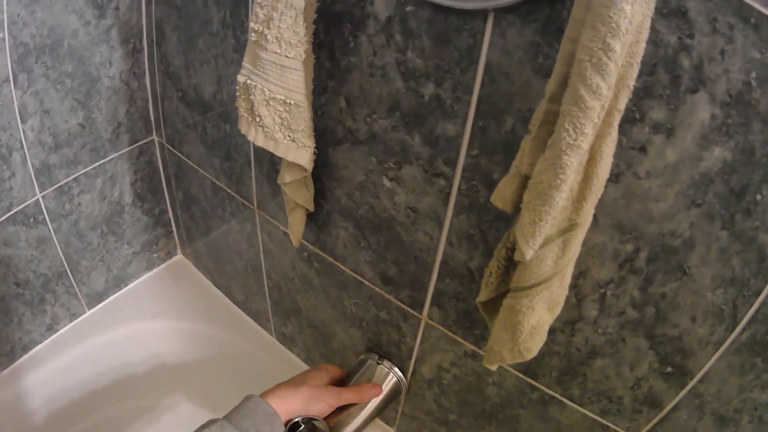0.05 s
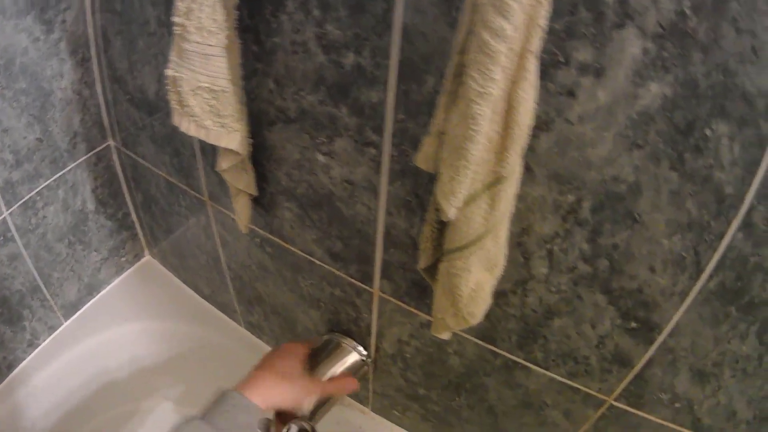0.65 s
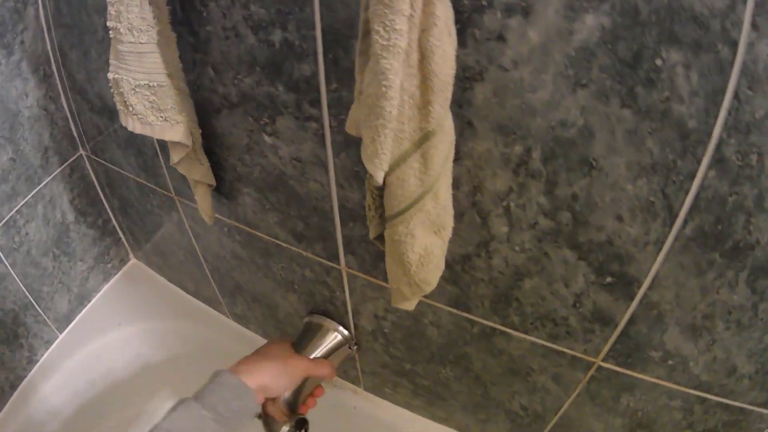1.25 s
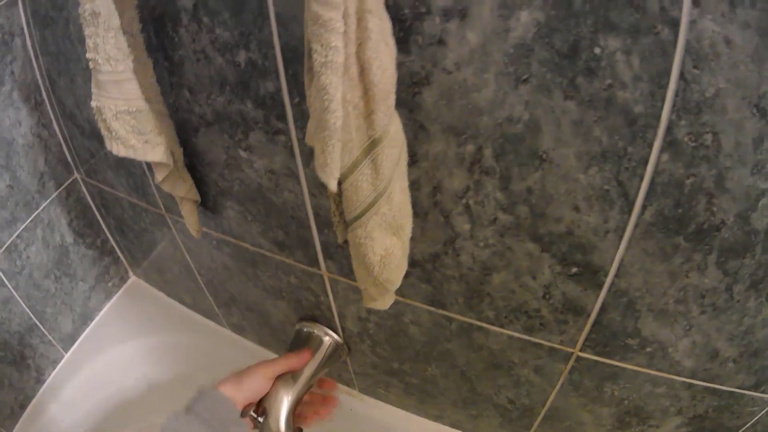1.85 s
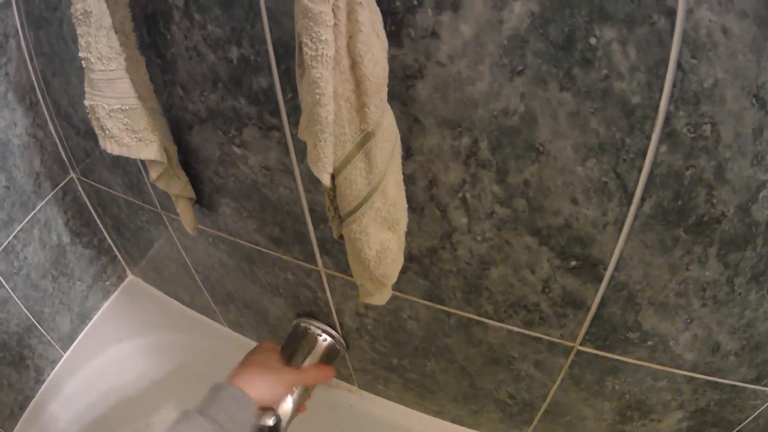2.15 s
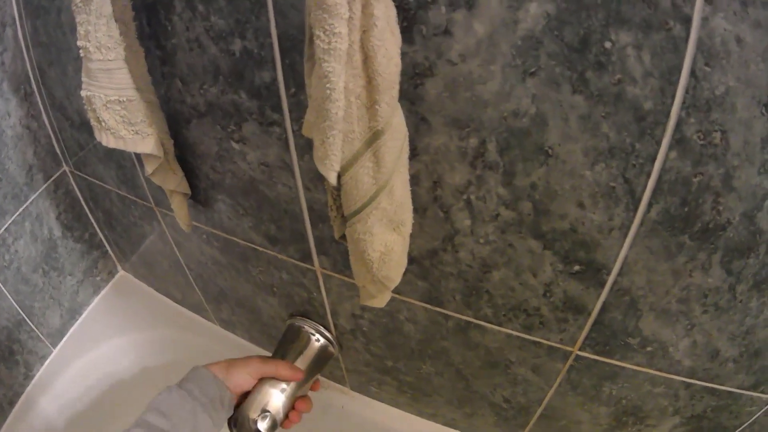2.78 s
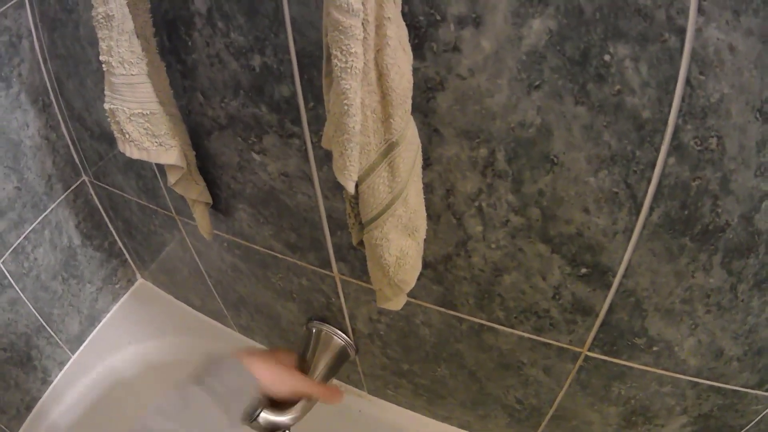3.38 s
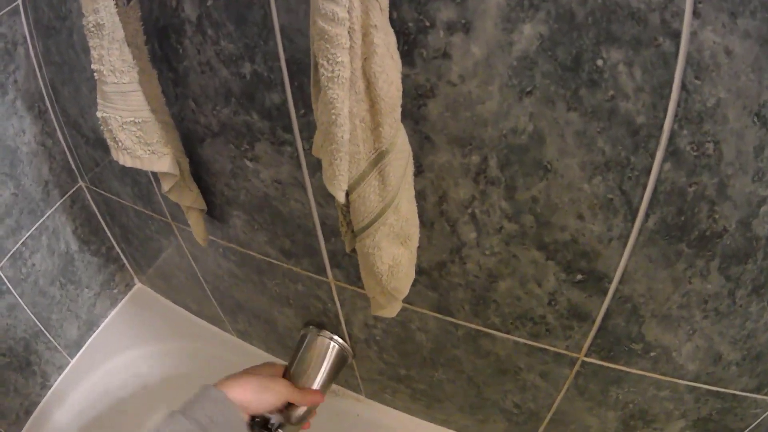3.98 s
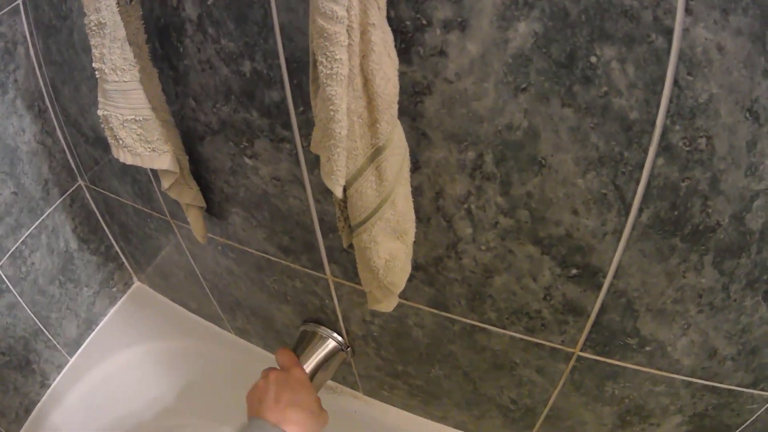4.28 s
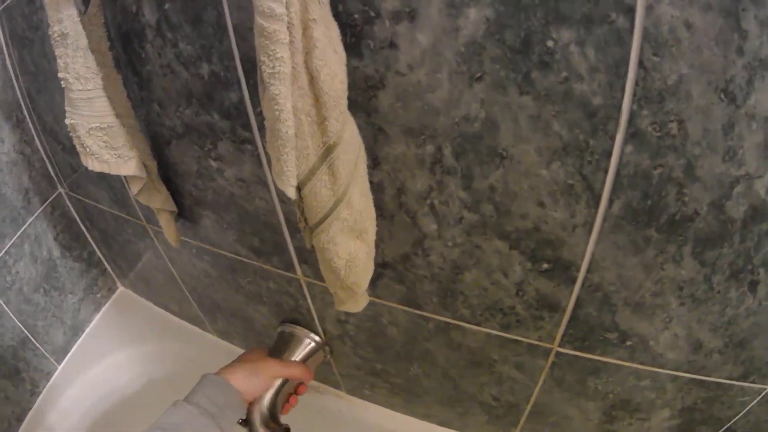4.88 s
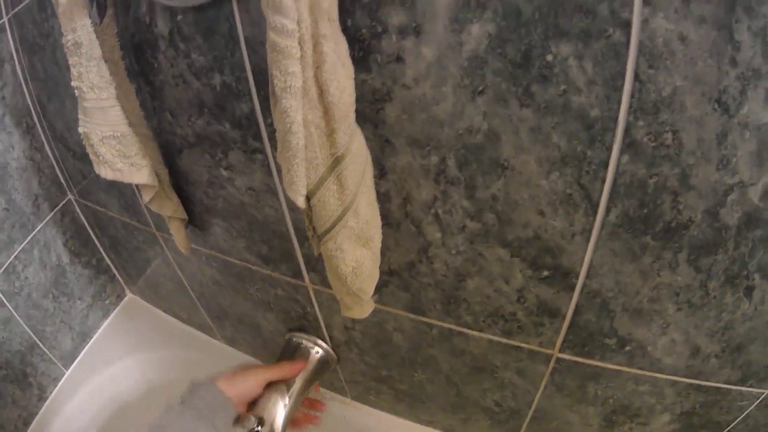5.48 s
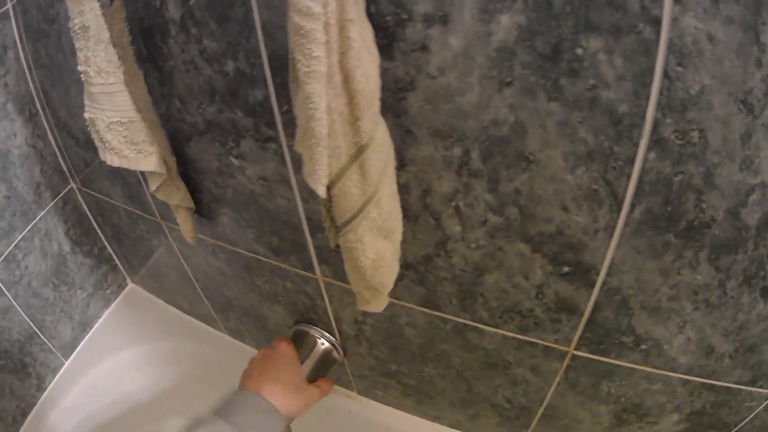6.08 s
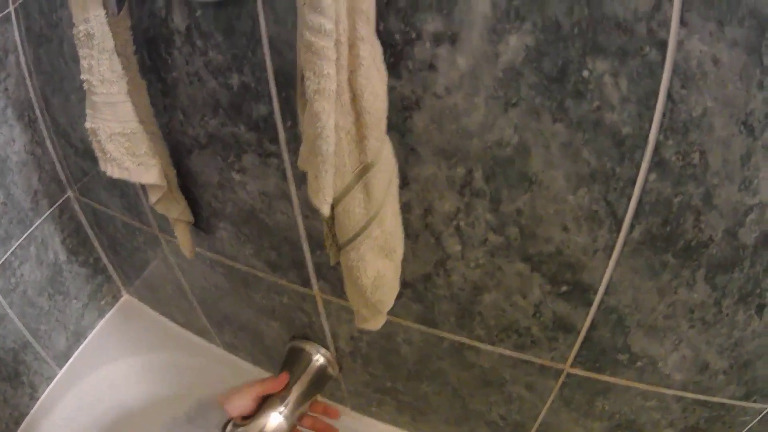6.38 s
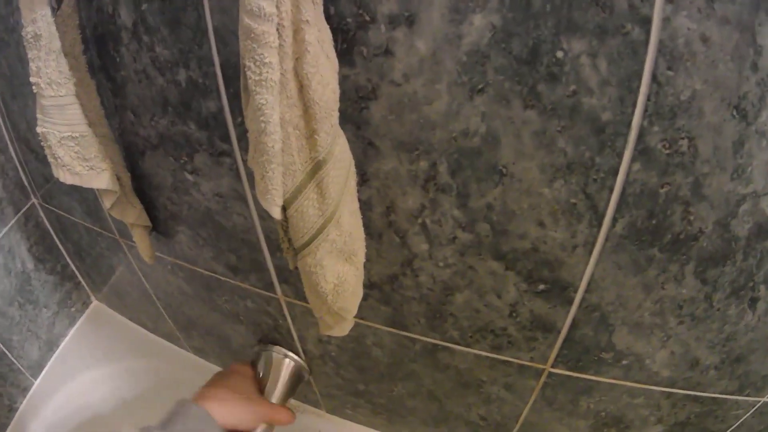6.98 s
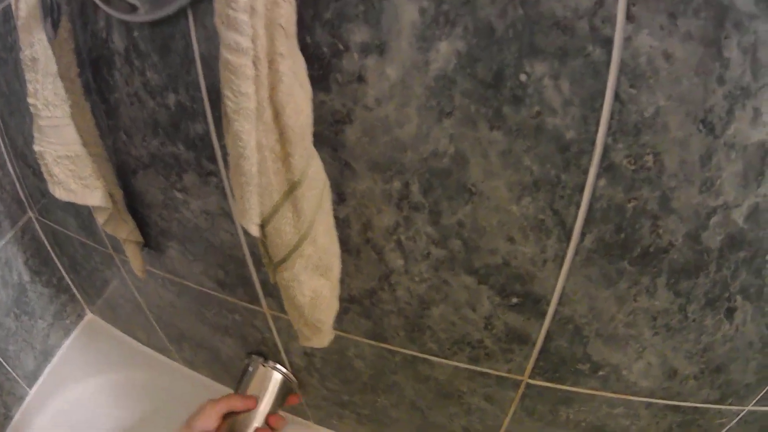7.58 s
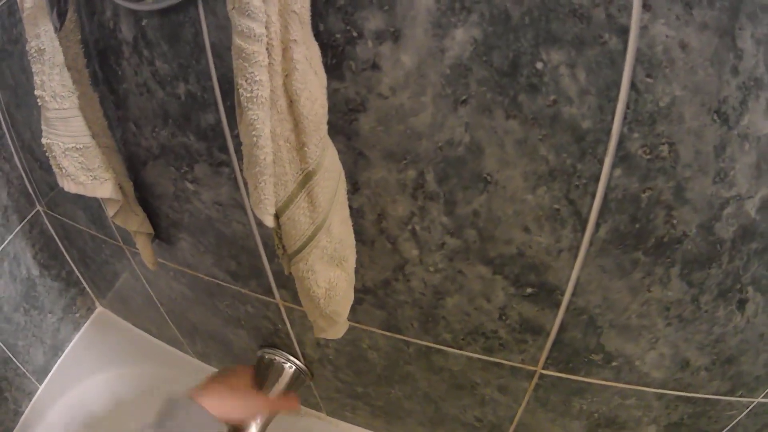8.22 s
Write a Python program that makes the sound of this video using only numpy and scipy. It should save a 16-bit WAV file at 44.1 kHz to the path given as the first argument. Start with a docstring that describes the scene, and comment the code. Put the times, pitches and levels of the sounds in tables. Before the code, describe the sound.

Hollow, boomy knocks come in irregular groups from a loose pipe in a bathroom wall as a metal spout is screwed on. Three quick knocks come early, followed by soft scraping turns, a ringing clink about halfway, and a busy run of clicks and thumps at the end. Low rubbing and a few tiny chirps accompany the twists. The microphone is fairly close, in a small tiled room with faint hiss.

```python
"""A loose pipe knocks in a hollow wall as a metal tub spout is screwed onto it by hand.
One microphone in a small tiled bathroom, near enough to catch some direct sound.
Each knock thumps the wall, rings the tile panel and makes the room boom briefly.
The spout clicks and rattles on the pipe; the threads scrape, grind, sing and chirp.
Behind them the hand rubs the pipe against the wall, over quiet room tone and hiss."""
import sys
import numpy as np
from scipy import signal
from scipy.fft import rfft, irfft, next_fast_len
from scipy.io import wavfile
from scipy.ndimage import map_coordinates

SR = 44100
rng = np.random.default_rng(int(sys.argv[2]) if len(sys.argv) > 2 else 0)


def bounce(signal):
    """Save signal as a 16-bit WAV file at the path given by the first command-line argument."""
    frames = np.transpose(np.atleast_2d(signal))
    limited = np.clip(frames, -1, 1)
    pcm = np.round(limited * 32767).astype(np.int16)
    wavfile.write(sys.argv[1], SR, pcm)


N = 363815
RING = SR * 3 // 5  # samples for a strike to die away

# The pipe's blows inside the wall; a hollow one favours the tile panel over the cavity:
# (time [s], strength [dB], hardness [0-1], hollowness [dB])
KNOCKS = [(0.896, -23.5, 0.61, 3), (1.018, -23, 0.86, 7.5), (1.146, -25, 0.84, 6.5),
          (1.356, -41.5, 0.45, 10.5), (1.74, -42.5, 0.64, -13), (2.103, -23.5, 0.72, 5),
          (2.464, -41.5, 0.38, 0.5), (2.768, -39.5, 0.31, -6.5), (2.953, -30.5, 0.73, 3.5),
          (3.421, -40.5, 0.45, -1), (3.494, -20, 0.55, 1.5), (3.768, -25, 0.68, 0), (3.924, -23.5, 0.88, 4),
          (4.064, -29, 0.57, -3.5), (4.184, -40, 0.13, -6), (4.46, -25.5, 0.56, 5), (4.79, -42, 0.46, 5),
          (4.872, -33, 0.44, 4), (4.959, -34, 0.91, 7.5), (5.046, -35.5, 0.92, 6), (5.131, -33.5, 0.29, 6),
          (5.204, -39, 0.97, 3.5), (5.71, -39, 0.17, -3), (5.8138, -26.5, 0.8, 4.5), (5.974, -30.5, 1, 1.5),
          (6.059, -28, 0.77, 7.5), (6.271, -50.5, 0.58, 4), (6.548, -52.5, .2, 8.5), (6.844, -22, 0.91, -1),
          (6.955, -28.5, 0.66, 5), (7.218, -20.5, 0.83, 0), (7.415, -22.5, 0.86, -2),
          (7.629, -24, 0.79, -8.5), (7.67, -33.5, 0.42, 9), (7.808, -25, 0.78, 2), (8.053, -18.5, 0.89, 3)]
# What a blow shakes, from the whole wall to the point of contact: (frequency [Hz], gain [dB])
THUMP = [(20, -48.5), (45, -21), (80, -22), (112, 4), (170, -1.5), (230, -3.5), (350, -28.5), (900, -64.5)]
CAVITY = [(25, -67.5), (80, -50.5), (170, 1.5), (270, 0), (440, -4.5), (560, -8.5), (750, -36),
          (1800, -61.5)]
TILE = [(200, -45), (450, 2.5), (580, 4), (740, 4), (870, -2.5), (1030, -11), (1190, -11.5), (1750, -13),
        (2300, -26.5), (5000, -50)]
CRACK = [(600, -41), (1400, 13), (2200, 1.5), (3500, -0.5), (4800, -2.5), (7200, -5.5), (9000, -19.5)]
# Modes of the hollow wall, the tile panel and the room: (frequency [Hz], width [Hz], gain [dB])
WALL_MODES = [(276, 76, 1.5), (405, 12, 4)]
PANEL_MODES = [(568, 40, 2), (736, 28, 10), (790, 30, 6), (862, 28, 11), (1015, 42, 9)]
ROOM_MODES = [(76, 7, 15), (117, 4.2, 9), (141, 4.2, 11), (241, 6, -2), (283, 8, 8), (377, 9, 3),
              (430, 9, 3), (790, 16, 3)]
def pipe_knocks():
    """Each blow shakes the wall and the room's standing waves; harder ones reach the tile and crack."""
    out, blow, t = np.zeros(N), signal.unit_impulse(RING), np.arange(RING) / SR
    boom = filtered(blow, resonances(ROOM_MODES))
    thump, cavity, tile, crack = map(colour, (THUMP, CAVITY, TILE, CRACK))
    cavity *= 1 + resonances(WALL_MODES)
    panel = tile * resonances(PANEL_MODES)
    radiation = signal.butter(2, 75, 'high', fs=SR, output='sos')  # the wall radiates little deep bass
    heavy_db, soft_hz, hard_hz = -24.5, 55.3, 400
    for s, db, hardness, hollow_db in KNOCKS:
        def share(soft_db, hard_db):
            """One part's gain, between that of a soft and a hard blow."""
            return amp(db + soft_db + hardness * (hard_db - soft_db))
        # heavy blows drive the near wall, so the microphone gets less room
        room = amp(11 - 0.63 * max(db - heavy_db, 0)) * (echoes() + amp(-5) * boom)
        thud = share(5.5, -9.5) * struck(blow + room, thump)
        add(out, s, thud)
        add(out, s + 0.02396 * rng.lognormal(0, 0.22), amp(-11) * thud)  # the pipe swings back
        add(out, s, share(-7.5, -3.5) * amp(-hollow_db / 4) * struck(blow + room, cavity))
        # the wall's first swing dies away in about four cycles
        cycles = t * soft_hz * (hard_hz / soft_hz) ** hardness
        swing = signal.sosfilt(radiation, amp(-60 * cycles / 3.9) * np.sin(2 * np.pi * cycles))
        add(out, s, amp(db + 0.5 + 1.4 * (db - heavy_db)) * swing)
        # the tile's knock arrives mostly through the room; its panel ring arrives more directly
        add(out, s, share(-46.5, -11) * struck(blow + amp(6) * room, tile))
        add(out, s, share(-29, -13) * amp(hollow_db) * struck(blow + amp(-8.5) * room, panel))
        add(out, s, share(-34.5, -16) * amp(hollow_db / 2) * panel_slap(t))
        # the crack comes from behind the spout, mostly by reflection
        add(out, s, share(-46.5, -28) * struck(blow + amp(18) * echoes(), crack))
    return out


def panel_slap(t):
    """The tile panel flexes: its modes start together and drift apart."""
    modes = [amp(db + rng.normal(0, 2.7)) * np.exp(-np.pi * width * t) * np.sin(2 * np.pi * hz * t)
             for hz, width, db in PANEL_MODES]
    return unit_attack(sum(modes))


# Spout on pipe, metal on metal; smear is low for a clean strike, high for a dragging one:
# (time [s], strength [dB], brightness [dB], note [Hz], note level [dB], grip damping [Hz], smear [dB])
CLICKS = [(0.256, -75, 6, 3300, -60.5, 160, 6), (0.884, -59.5, 4.5, 5470, -64, 328, -6),
          (0.905, -61.5, -17, 1190, -46.5, 257, 5), (1.777, -63, -4, 3320, -60, 58, 15),
          (2.02, -73.5, 3, 3930, -68, 99, 3), (2.039, -80.5, -5, 5680, -63, 123, -15),
          (2.255, -69.5, -8, 5430, -68, 161, 2), (3.056, -68.5, -8, 2700, -60.5, 67, -2),
          (3.242, -56.5, -8.5, 1700, -59, 137, 5), (3.294, -49.5, -6.5, 1670, -40, 299, 5),
          (3.7655, -41.5, 9.5, 5790, -30, 37.5, -6.5), (3.768, -49, 9.5, 6200, -31, 31, -9),
          (3.7705, -44.5, -5, 3916, -40, 1.5, -5), (3.775, -50.5, 7.5, 1530, -35, 196, 4),
          (3.842, -52, -6.5, 3120, -58, 329, 2), (4.48, -56.5, -6.5, 5850, -57, 109.5, 1),
          (4.524, -62, -12.5, 1970, -50.5, 202, 11.5), (4.692, -64.5, -8.5, 1810, -46, 180, 4),
          (4.693, -66, 7.5, 5650, -55.5, 202.5, -4.5), (4.773, -68, -7, 3180, -66, 113, -3),
          (5.131, -77, -18, 3230, -66, 104, 2), (5.974, -65, -9, 3970, -62.5, 300, -6),
          (6.022, -66.5, -13, 4000, -56.5, 148.5, 6), (6.059, -57, -11, 3400, -55, 253.5, -3.5),
          (6.944, -66, -6.5, 5770, -62.5, 241, -2), (7.076, -40.5, -3, 2650, -42.5, 150, -3),
          (7.083, -55, 5.5, 6760, -57.5, 230, -16), (7.271, -60.5, 2, 5700, -57, 122, 3),
          (7.278, -65.5, 1, 5740, -58.5, 165, -9), (7.429, -61, 4, 5660, -62, 60, 8),
          (7.455, -48.5, 8.5, 5730, -43, 79, 1.5), (7.619, -51, -5, 2000, -53.5, 195, 12),
          (7.6295, -46, -5.5, 2610, -36.5, 176, -7.5), (7.645, -42, -4.5, 1885, -36.5, 88, -7),
          (7.669, -49.5, -10.5, 2230, -44.5, 115, -4), (7.689, -52, -1, 6160, -51, 310, -10),
          (7.7705, -50, -1, 6240, -58, 206, -12), (7.849, -72, -3, 3700, -70, 252.5, 3),
          (8.052, -61, -20, 3400, -49.5, 346.5, -3.5)]
# The spout's shell: (frequency [Hz], width [Hz], gain [dB])
SHELL_MODES = [(1295, 80, -5), (1560, 60, -2), (1735, 50, -2), (1933, 24, 1), (2335, 28, -4), (2662, 36, 0),
               (3210, 110, -2), (3600, 200, -9), (3916, 24, 2), (4130, 110, -1), (4447, 90, -13),
               (5140, 40, -10), (5500, 240, -7), (5832, 34, 3), (6228, 40, -1), (6400, 120, -7),
               (6670, 45, -7), (7450, 300, -12)]
def spout_clicks():
    """The spout scuffs, strikes and chatters; the spot decides which modes ring, the grip how long."""
    out, t = np.zeros(N), np.arange(RING) / SR
    crack, tile = colour(CRACK), colour(TILE)
    contact = 1 / (1 + (grid(RING) / 7500) ** 30)  # a strike lasts too long to excite higher modes
    clink_at_db, chatter_t60_s, scuff_s = -57, 0.028, 0.009
    scuff_size = round(scuff_s * SR)
    for s, db, bright_db, note_hz, note_db, grip_hz, smear_db in CLICKS:
        # no two strikes land on the same spot
        shell = [(hz, width + grip_hz, gain + rng.normal(0, 8)) for hz, width, gain in SHELL_MODES]
        families = shell[:6], shell[6:10], shell[10:], [(note_hz, 31 + grip_hz, 0)]
        chatter = rng.standard_normal(RING) ** 3 * amp(-60 * t / chatter_t60_s)
        smear = amp(1.5) * unit_energy(chatter) + amp(5.5) * echoes()
        strike = signal.unit_impulse(RING) + amp(smear_db) * smear
        # light taps ring mostly the middle modes; hard ones spread to the low and high
        over_db = db - clink_at_db
        family_db = np.array([db - bright_db, -53.5 + 0.71 * over_db, db + bright_db])
        add(out, s, amp(-0.1 * grip_hz) * free_ring(family_db, t))  # a firm grip mutes it
        gains = amp([*(family_db - 3), note_db])
        gripped_ring = sum(gain * struck(strike, contact * resonances(modes))
                           for gain, modes in zip(gains, families))
        snap = amp(-15) * np.linalg.norm(gains) * struck(strike, crack)
        add(out, s, gripped_ring + snap)
        add(out, s, amp(-49.5 + 0.43 * over_db) * struck(strike, tile))  # passed on by the pipe
        # sliding contact builds up just before the strike
        scuff = unit_energy(rng.standard_normal(scuff_size) * np.linspace(0, 1, scuff_size) ** 2)
        add(out, s - scuff_s, amp(smear_db - 15.5) * signal.fftconvolve(gripped_ring, scuff))
    return out


def free_ring(family_db, t, t60_s=0.19, widest_hz=48):
    """The shell's sharpest modes ring on past the hand, as hard as the strike drives their family."""
    ring = np.zeros(RING)
    for hz, width, db in SHELL_MODES:
        if width < widest_hz:
            drive_db = np.interp(hz, [2700, 3900, 5100], family_db) + rng.normal(0, 2.5)
            ring += amp(db + drive_db - 1) * np.sin(2 * np.pi * (hz * t + rng.random()))
    return ring * amp(-60 * t / t60_s) * (1 - np.exp(-t / 0.001))


# A small metal part, heard direct: (frequency [Hz], level [dB], t60 [s])
PING_MODES = [(4142, -41, .23), (5136, -54, .28), (5814, -55, .18)]
def ping(at_s=7.488, attack_s=0.00079):
    """One light tap rings on, undamped by the hand."""
    out, t = np.zeros(N), np.arange(RING) / SR
    ring = sum(amp(db - 60 * t / t60) * np.sin(2 * np.pi * hz * t) for hz, db, t60 in PING_MODES)
    add(out, at_s, ring * (1 - np.exp(-t / attack_s)))
    return out


# Twists of the wrist; scrape and rub count from the force:
# (peak time [s], rise [s], fall [s], force [dB], dry scrape [dB], rub on the tile [dB])
TURNS = [(0.321, 0.21, 0.12, -59, -14.5, 10.5), (1.36, 0.52, 0.093, -54, -14.5, 5.5),
         (1.545, 0.19, 0.043, -46, -13, 5.5), (2.291, 0.27, 0.21, -54, -12, 6.5),
         (3.169, 0.28, 0.064, -50, -19, 3), (3.303, 0.12, 0.04, -41, -2.5, 2),
         (4.281, 0.14, 0.083, -42.5, -17, 4.5), (5.111, 0.18, 0.16, -57.5, -4, -3.5),
         (6.034, 0.098, 0.089, -52, 2, -5), (7.001, 0.18, 0.2, -42.5, -26.5, -4.5),
         (7.902, 0.068, 0.074, -40, -12.5, 4), (8.029, 0.3, 0.046, -47.5, 3, 4.5)]
# The spout glides on the thread: (peak time [s], rise [s], fall [s], level [dB])
GLIDES = [(0.29, .16, 0.11, -72), (1.46, 0.067, 0.12, -71.5), (3.16, 0.056, 0.13, -59.5),
          (5.949, 0.042, 0.081, -65.5)]
# What the turning threads set ringing: (frequency [Hz], width [Hz], gain [dB])
SCRAPE_MODES = [(2690, 110, -1.5), (3220, 62, 5.5), (4010, 100, 1.5), (4500, 820, -14), (5100, 440, -12),
                (6440, 2000, -24)]
GRIND_MODES = [(1225, 360, 9), (1735, 75, 13.5), (1708, 120, 10.5), (2120, 38, 1.5), (2430, 660, -30),
               (3940, 530, -24), (6550, 1300, -43.5)]
SING_MODES = [(3180, 85, -4), (4100, 99, -12)]
def threads(bind_db=-42.5):
    """Thread flanks scrape through a turn, grind where they bind and sing where they glide."""
    _, _, _, force_db, dry_db, _ = np.transpose(TURNS)
    scraping = turning(dry_db, swell_db=18.3)
    grinding = turning(0.8 * (force_db - bind_db) - 7, swell_db=8.7) + hand_slides()
    gliding = sum(swell(*glide, swell_db=4.5) for glide in GLIDES)
    scrape = friction(scraping, resonances(SCRAPE_MODES, N), slips_per_s=1300, room_db=-7)
    grind = friction(grinding, resonances(GRIND_MODES, N), slips_per_s=1000, room_db=4)
    sing = friction(gliding, resonances(SING_MODES, N), slips_per_s=1100, room_db=-0.5)
    return scrape + grind + sing


# Chirps of the dry thread flanks: (time [s], pitch [Hz], level [dB])
SQUEAKS = [(1.354, 4930, -62), (4.23, 4900, -64), (5.23, 5060, -62)]
def squeaks():
    """Stick and slip locks briefly onto one wavering pitch."""
    out, t = np.zeros(N), np.arange(N) / SR
    for s, hz, db in SQUEAKS:
        phase = 2 * np.pi * np.cumsum(hz * (1 + 0.008 * wobble(300))) / SR
        out += amp(db) * np.exp(-((t - s) / 0.007) ** 2) * np.sin(phase)
    return out + amp(-6) * signal.fftconvolve(out, echoes())[:N]


def wall_rub(tighten_db_per_s=0.96):
    """The hand rubs the pipe against the wall, which rumbles more as the spout tightens."""
    peak_s, *_, rub_db = np.transpose(TURNS)
    rumbling = turning(1.3 + tighten_db_per_s * peak_s, swell_db=12) + amp(-5.5) ** 2 * hand_slides()
    rubbing = turning(rub_db - 2.6, swell_db=21) + amp(3.5) ** 2 * hand_slides()
    rubbing += amp(-73 + 8.5 * wobble(6.5)) ** 2  # the hand never quite rests
    wall = colour(THUMP, N) + amp(-1) * colour(CAVITY, N)
    wall *= 1 + amp(-6) * resonances(ROOM_MODES, N)
    tile = colour(TILE, N) * (1 + resonances(PANEL_MODES, N))
    rumble = friction(rumbling, wall, slips_per_s=300, room_db=-2)
    rub = friction(rubbing, tile, slips_per_s=480, room_db=-4.5)
    return rumble + rub


# The hand on the spout between turns: (peak time [s], level [dB])
SLIDES = [(0.02, -69.5), (2.052, -58.5), (4.64, -60.5), (6.799, -63.5)]
def hand_slides():
    """Friction power of the hand sliding to a new grip."""
    return sum(swell(peak, rise=0.25, fall=0.37, db=db, swell_db=13.5) for peak, db in SLIDES)


# The small bathroom's reverberation: (frequency [Hz], t60 [s])
ROOM_DECAY = [(80, 0.63), (150, 0.25), (300, 0.51), (700, 0.32), (1500, 0.31), (4000, 0.21), (8000, 0.16)]
def echoes():
    """A fresh tail of tile reflections, energy 1, building up over a few milliseconds."""
    hz, t, noise = signal.stft(rng.standard_normal(RING), SR, nperseg=256)
    decay = amp(-60 * t / along(ROOM_DECAY, hz)[:, None])
    tail = signal.istft(noise * decay, SR, nperseg=256)[1][:RING]
    return unit_energy(tail * (1 - np.exp(-np.arange(RING) / SR / 0.0027)))


# The noise floor at the microphone: (frequency [Hz], relative level [dB])
ROOM_TONE = [(25, -23.5), (64, -11), (101, -12.5), (126, 2.5), (209, -16.5), (347, -10), (562, -26),
             (1050, -36.5), (1630, -37), (2070, -43.5), (7090, -42.5), (8000, -41.5), (10400, -74.5),
             (17600, -120)]
def room_tone():
    """The quiet room and the microphone's hiss."""
    noise = filtered(rng.standard_normal(N), colour(ROOM_TONE, N))
    return amp(-55) * noise / rms(noise)


def friction(power, body, slips_per_s, room_db):
    """Tiny uneven slips, following a movement's power, excite a body and the room."""
    catch_db = 2.5 * wobble(70) - 0.8  # the movement catches as it goes
    pressure = np.sqrt(power + 1e-12) * amp(catch_db)
    sizes = np.exp(0.35 * rng.standard_normal(N)) * rng.choice([-1, 1], N)
    slips = (rng.random(N) < slips_per_s / SR) * sizes
    room = signal.unit_impulse(RING) + amp(room_db) * echoes()
    heard = lambda force: signal.fftconvolve(filtered(force, body), room)[:N]
    return heard(slips * pressure) / np.std(heard(slips))


def turning(over_force_db, swell_db):
    """Friction power through all the turns, given each one's level over its force."""
    return sum(swell(peak, rise, fall, force_db + over_db, swell_db)
               for (peak, rise, fall, force_db, _, _), over_db in zip(TURNS, over_force_db))


def swell(peak, rise, fall, db, swell_db):
    """Power of one stroke: it climbs by swell_db to its peak and eases off."""
    t = np.arange(N) / SR - peak
    level_db = db + np.interp(t, [-rise, 0, fall], [-swell_db, 0, -swell_db])
    return amp(level_db) ** 2 * ((t > -rise) & (t < fall))


def wobble(knots_per_s):
    """A smooth random curve."""
    knots = rng.standard_normal(int(N * knots_per_s / SR) + 4)
    return map_coordinates(knots, [np.arange(N) * knots_per_s / SR])


def amp(db):
    """Decibels to gain."""
    return 10 ** (np.asarray(db) / 20)


def rms(x):
    """Root mean square, never zero."""
    return np.sqrt(np.mean(x ** 2) + 1e-20)


def unit_energy(x):
    """x with energy 1."""
    return x / np.linalg.norm(x)


def unit_attack(x):
    """x with rms 1 over its first 50 ms."""
    return x / rms(x[:SR // 20])


def struck(force, body):
    """A body's answer to a blow, with its attack at rms 1."""
    return unit_attack(filtered(force, body))


def along(points, hz):
    """Interpolate (Hz, value) points on a log axis."""
    f, values = np.transpose(points)
    return np.interp(np.log(hz + 1), np.log(f + 1), values)


def grid(size):
    """Frequencies of a spectrum with room for a tail after size samples."""
    return np.fft.rfftfreq(2 * next_fast_len(size // 2 + 4096), 1 / SR)


def filtered(x, response):
    """x through a response given on its grid."""
    padded = 2 * (len(response) - 1)
    return irfft(rfft(x, padded) * response, padded)[:len(x)]


def colour(points, size=RING):
    """Causal response with the gain of (Hz, dB) points."""
    cepstrum = irfft(np.log(amp(along(points, grid(size)))))
    half = len(cepstrum) // 2
    cepstrum[1:half] *= 2
    cepstrum[half + 1:] = 0
    return np.exp(rfft(cepstrum))


def resonances(modes, size=RING):
    """Causal response of (Hz, width, dB) modes, alternating in sign."""
    f = grid(size)
    return sum((-1) ** k * amp(db) * 1j * f * width / (hz * hz - f * f + 1j * f * width)
               for k, (hz, width, db) in enumerate(modes))


def add(track, s, x):
    """Mix x into the track at s seconds."""
    start = max(round(s * SR), 0)
    track[start:start + len(x)] += x[:N - start]


def scene():
    """All sources at one microphone in the bathroom."""
    return (pipe_knocks() + spout_clicks() + ping() + threads() + squeaks()
            + wall_rub() + room_tone())[None]


def record(dry):
    """The recorder keeps nothing above its band limit."""
    top_hz = 7700
    low_pass = 1 / np.sqrt(1 + (grid(N) / top_hz) ** 70)
    return np.array([filtered(channel, low_pass) for channel in dry])


dry = scene()
out = record(dry)
bounce(out)
```